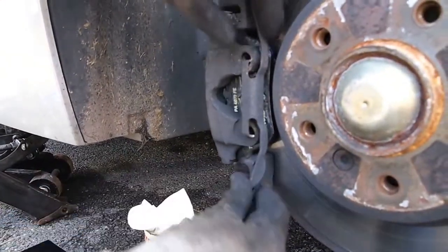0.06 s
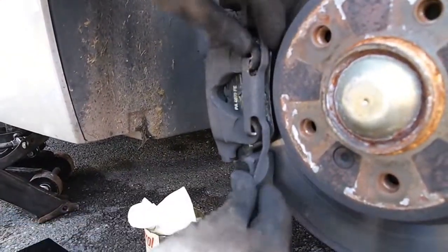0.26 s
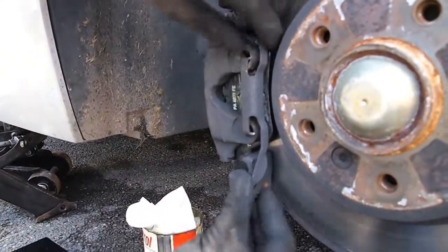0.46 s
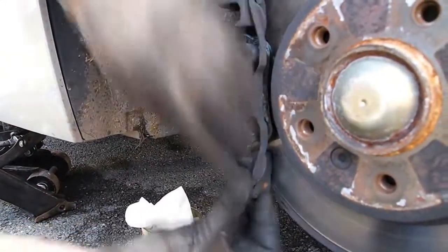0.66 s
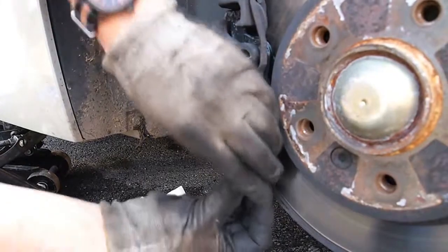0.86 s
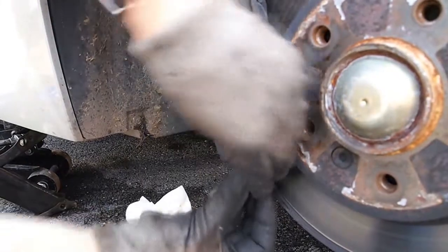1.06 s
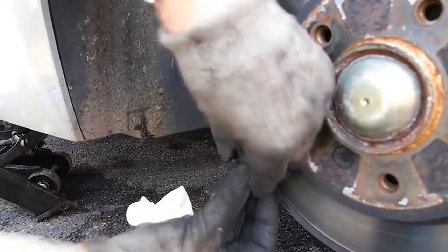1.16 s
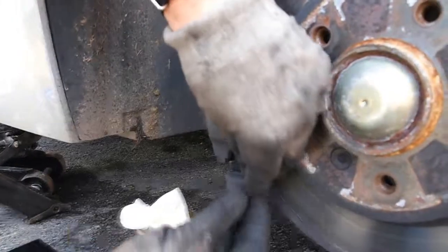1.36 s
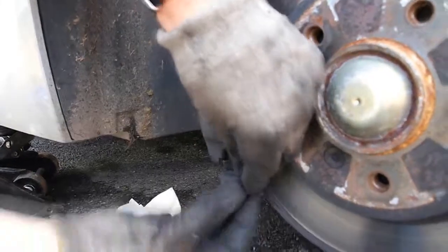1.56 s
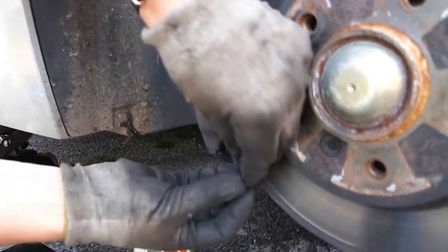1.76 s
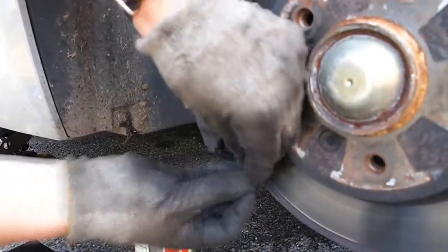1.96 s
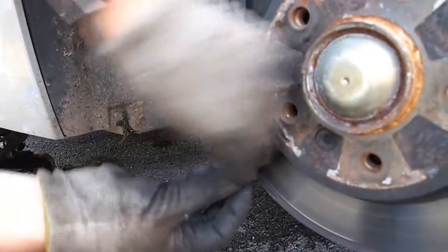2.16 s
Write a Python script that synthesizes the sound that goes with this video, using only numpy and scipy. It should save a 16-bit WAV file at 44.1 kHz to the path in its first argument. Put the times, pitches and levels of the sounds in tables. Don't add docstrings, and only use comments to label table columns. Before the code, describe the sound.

Close-up brake pad clanks outdoors: a bright bouncing snap first, small ticks, a gritty stick-slip slide with a duller knock, then a loud ringing clank as it seats, over quiet wind, distant traffic and hiss.

```python
import sys
import numpy as np
from scipy import signal
from scipy.fft import rfft, irfft
from scipy.io import wavfile
from scipy.ndimage import uniform_filter1d

SR = 44100
rng = np.random.default_rng(int(sys.argv[2]) if len(sys.argv) > 2 else 0)


def voltage_ratio(decibels):
    exponent = np.asarray(decibels, float) / 20
    return 10 ** exponent


def unload_wav(signal):
    wavfile.write(
        sys.argv[1],
        SR,
        np.round(np.clip(np.atleast_2d(signal).T, -1, 1) * 32767).astype(np.int16),
    )


N = 97020


def evened(x):
    return x / np.sqrt(np.mean(x ** 2) + 1e-20)


def read(points, hz):
    f, value = np.transpose(points)
    return np.interp(np.log(hz + 1), np.log(f + 1), value)


def add(mix, s, sound):
    part = mix[round(s * SR):][:len(sound)]
    part += sound[:len(part)]


def band(x, hz, width):
    turn = np.exp(2j * np.pi * hz * np.arange(len(x)) / SR)
    r = np.exp(-np.pi * width / SR)
    smooth = signal.lfilter([(1 - r) ** 2], [1, -2 * r, r * r], x / turn)
    return 2 * (turn * smooth).real


# f/Hz, spectral density level/dB
AIR_SPECTRUM = [(22, -6.5), (50, 2.5), (250, -5.5), (1100, -14.5), (2200, -24.5), (5500, -35), (8500, -33),
                (12500, -31), (15800, -30.5)]


def air():
    level_db, hiss_edge_hz = -40, 15800
    frames, hz = N // 512 + 5, np.fft.rfftfreq(2048, 1 / SR)
    real, imag, patches = rng.standard_normal((frames, 1025, 3)).T
    patches = uniform_filter1d(patches, size=12, axis=0)
    patches = evened(uniform_filter1d(patches, size=6, axis=1))
    drift_db = 0.5 * patches / (1 + (hz[:, None] / 4000) ** 2)
    z = (real + 1j * imag) * voltage_ratio(read(AIR_SPECTRUM, hz)[:, None] + drift_db)
    z = z * (hz < hiss_edge_hz)[:, None]
    noise = signal.istft(z, nperseg=2048, noverlap=1536)[1][:N]
    return voltage_ratio(level_db) * evened(noise)


# t/s, duration/s, level/dB, f/Hz
BUMPS = [
    (0.429, 0.1, -54, 61.6),
    (1.075, 0.047, -53, 45.5),
    (1.42, 0.13, -37, 45.4),
    (1.755, 0.15, -32, 66.5),
]


def bumps():
    wander = 0.179
    out = np.zeros(N)
    for (s, length, db, hz), phase in zip(BUMPS, rng.random(len(BUMPS))):
        t = np.arange(0, length, 1 / SR)
        turns = np.cumsum(hz * (1 + wander * np.cos(3 * np.pi * t / length))) / SR
        swell = np.sin(np.pi * t / length) ** 0.5
        add(out, s, voltage_ratio(db) * swell * np.sin(2 * np.pi * (turns + phase)))
    return out


# t/s, duration/s, level/dB, centre f/Hz
RUBS = [(.25, 0.15, -32, 170), (0.398, 0.14, -40, 193), (0.491, 0.085, -57, 3150), (.56, 0.028, -54, 6000),
        (0.781, 0.042, -48.5, 3530), (0.901, 0.025, -50, 4000), (0.983, 0.048, -55, 2490),
        (1.176, 0.15, -50.5, 2170), (1.328, 0.16, -52.5, 4050), (1.416, 0.085, -43, 3320),
        (1.425, 0.1, -36.5, 400), (1.739, 0.061, -55, 3400), (2.156, 0.083, -51.5, 3370),
        (0.272, 0.15, -42, 640), (0.268, .15, -53, 2200), (.89, 0.067, -42, 258), (1.332, 0.09, -52, 375),
        (1.954, 0.093, -53, 3800)]


def rubs():
    grains_per_s, grain_spread_db, relative_width = 2500, 2.5, 1.03
    out = np.zeros(N)
    for (s, length, db, hz), draw in zip(RUBS, rng.random((len(RUBS), 3, 8000))):
        n = min(round(length * SR), 8000)
        present = draw[0] < grains_per_s / SR
        sign = np.sign(draw[1] - 0.5)
        grains = present * sign * voltage_ratio(-grain_spread_db * np.log(draw[2] + 0.00059))
        rub = evened(band(grains, hz, relative_width * hz))[:n]
        stroke = np.sin(np.pi * np.arange(n) / n) ** 0.63
        add(out, s, voltage_ratio(db) * rub * stroke)
    return out


# t/s, level/dB, f/Hz, bandwidth/Hz, t60/s
TICKS = [(0.437, -42.5, 3220, 4800, 0.051), (0.477, -35.5, 794, 199, 0.025),
         (0.599, -45.5, 3170, 800, 0.044), (0.785, -47, 2050, 1510, 0.07), (0.788, -45, 3880, 4000, 0.036),
         (0.797, -55, 5830, 400, 0.11), (.81, -48, 1660, 150, .15), (.905, -43, 1000, 300, 0.23),
         (0.908, -50, 2260, 200, 0.24), (1.232, -54, 5350, 300, 0.333), (1.342, -42.5, 6270, 5000, 0.042),
         (1.375, -44, 5500, 4060, 0.033), (1.39, -49.5, 3500, 300, 0.095), (1.425, -30, 710, 845, 0.29),
         (1.4253, -25, 1740, 900, 0.21), (1.4497, -29, 6100, 3430, 0.059), (1.467, -28.5, 690, 870, 0.046),
         (1.4709, -39.5, 5100, 6000, 0.2), (1.507, -33, 2000, 2410, 0.1), (1.5062, -39, 6400, 4000, 0.038),
         (1.521, -38, 2310, 3960, 0.026), (1.8014, -30, 2350, 813, 0.037), (2.058, -43, 2380, 250, 0.46),
         (2.1017, -34.5, 2520, 490, 0.035), (2.102, -38, 4520, 1190, 0.05), (2.126, -41, 6780, 2530, 0.025)]


def ticks():
    out, t = np.zeros(N), np.arange(6000) / SR
    for (s, db, hz, width, t60), noise in zip(TICKS, rng.standard_normal((len(TICKS), 6000))):
        click = 5.9 * np.sqrt(SR / width) * (t == 0) / 3
        rattle = evened(band(noise + click, hz, width))
        add(out, s, voltage_ratio(db - 4.5 - 60 * t / t60) * rattle)
    return out


def ring(modes, size=SR):
    twin_ratio, twin_db = 1.011, -11
    t, out = np.arange(size) / SR, 0
    for hz, db, t60 in modes:
        phase = rng.random()
        main = np.sin(2 * np.pi * (hz * t + phase))
        twin = np.sin(2 * np.pi * (hz * twin_ratio * t - phase))
        out = out + voltage_ratio(db - 60 * t / t60) * (main + voltage_ratio(twin_db) * twin)
    return out


# t/s, level/dB
SLIPS = [(1.4274, -21.5), (1.4305, -17), (1.432, -16), (1.438, -21), (1.4428, -26), (1.448, -24),
         (1.4529, -28), (1.455, -30), (1.463, -35), (1.467, -30), (1.474, -32), (1.483, -34.5),
         (1.493, -33), (1.5065, -34), (1.5099, -27), (1.513, -28), (1.5215, -22), (1.527, -31)]
# f/Hz, level/dB, t60/s
SLIP_MODES = [(413, -5.5, 0.024), (800, -4.5, .02), (1114, -2, 0.022), (1714, 1.5, 0.023),
              (2580, -9, 0.017), (3470, -2, 0.013), (6000, -7, 0.0067)]


def slips():
    level_db, scatter = -10, 0.096
    out = np.zeros(N)
    for s, db in SLIPS:
        shift = 1 + scatter * rng.standard_normal(len(SLIP_MODES))
        modes = [(hz * k, d, t60) for (hz, d, t60), k in zip(SLIP_MODES, shift)]
        add(out, s, voltage_ratio(db + level_db) * ring(modes, size=3000))
    return out


# t/s, swell/s, f/Hz, level/dB, t60/s
BENDS = [(.2213, 0.0033, 1040, -11.5, .04), (.2269, .005, 1056, -8, 0.032),
         (.2345, 0.0081, 2332, -8.5, 0.13), (.236, 0.0081, 787, -17, 0.12),
         (1.585, 0.0031, 958, -14, 0.051), (1.5935, 0.0033, 950, -16, 0.016),
         (1.602, 0.0055, 958, -19, 0.084), (1.596, 0.0065, 524, -34, 0.095),
         (1.9407, 0.0079, 786, -12.5, 0.056), (1.939, 0.0054, 1390, -17, 0.043),
         (1.9345, 0.0015, 3250, -15, .03), (1.94, 0.0041, 4400, -14.5, .04),
         (1.4251, 0.00041, 1480, -12, 0.0041), (1.4275, 0.0022, 1900, -26.5, 0.057),
         (1.467, .001, 860, -25.5, .01), (0.7, 0.00044, 2040, -35.5, 0.0065),
         (.233, 0.0014, 1066, -13.5, .02), (1.587, .006, 1040, -24, 0.059), (1.938, 0.012, 548, -16.5, .2),
         (1.94, 0.021, 462, -23, 0.15), (1.936, 0.0062, 400, -21, 0.072)]


def bends():
    out, t = np.zeros(N), np.arange(SR // 2) / SR
    for s, swell, hz, db, t60 in BENDS:
        rise = np.sin(np.pi / 2 * np.minimum(t / swell, 1)) ** 2
        decay = voltage_ratio(db - 60 * np.maximum(t - swell, 0) / t60)
        add(out, s, rise * decay * np.sin(2 * np.pi * hz * t))
    return out


# f/Hz, t60/s
CRACK_T60 = [(120, 0.69), (300, 0.36), (1000, 0.17), (3000, 0.098), (6000, 0.055), (10000, 0.054),
             (16000, 0.038)]


def crack(colour):
    tail_db, tail_stretch = -23, 3.67
    t, edges, out = np.arange(SR) / SR, np.geomspace(80, 18000, 25), 0
    z, hz = rfft(rng.standard_normal((2, SR))), np.fft.rfftfreq(SR, 1 / SR)
    z = z * voltage_ratio(read(colour, hz))
    z = z / np.sqrt(np.sum(abs(z) ** 2)) * SR
    for lo, hi in zip(edges, edges[1:]):
        fall_db = -60 * t / read(CRACK_T60, np.sqrt(lo * hi))
        near, far = irfft(z * ((hz >= lo) & (hz < hi)), SR)
        out = out + near * voltage_ratio(fall_db) + far * voltage_ratio(tail_db + fall_db / tail_stretch)
    return out


# t/s, level/dB, contact time/ms
SNAP = [
    (.2215, -4.5, 0.76),
    (.2245, -14, 0.28),
    (.229, -16, 0.34),
    (.2345, -3.5, 0.078),
    (.2362, -6.5, 0.11),
    (.2389, -8, 0.074),
    (.2435, -7, 0.26),
    (.2505, -11, 0.51),
]
KNOCK = [
    (1.585, -17, 0.18),
    (1.589, -31, 0.51),
    (1.5956, -21, 0.3),
    (1.6029, -24, 0.67),
]
SEAT = [
    (1.9349, -2, 0.12),
    (1.939, -6, 0.28),
    (1.943, -13.5, 0.36),
    (1.951, -7, 1),
    (1.962, -10, 0.54),
]
# f/Hz, level/dB, t60/s
SNAP_MODES = [(170, -10, 0.21), (530, -8, 0.061), (769, -5, 0.079), (1220, -13, 0.12), (1660, -10.5, 0.13),
              (2070, -5, 0.0544), (2185, -5, 0.11), (2344, -11.5, 0.24), (1440, -18, 0.046),
              (2560, -7, 0.084), (2634, -9.5, 0.25), (2720, -5.5, .1), (3030, -18, 0.21), (3610, -7, 0.053),
              (4180, -8, 0.044), (4680, -6.5, 0.1), (5760, 7.5, 0.015), (6460, -9, 0.067)]
KNOCK_MODES = [(246.4, -11.5, 0.144), (523.6, -11.5, 0.16), (783, -19, 0.22), (963, -16, 0.093),
               (2103, -10, .08), (2350, -14.5, .087), (2425, -18.5, 0.24), (3130, -14, 0.095),
               (3192, -21, 0.083), (3532, -8, 0.071), (6000, -10, 0.045)]
SEAT_MODES = [(1096, -11, .15), (1153, -7, 0.13), (1323, -9, 0.12), (1380, -5, 0.072), (1945, -11.5, 0.23),
              (2245, 3.5, 0.078), (2332, 1.5, 0.14), (2597, -3, 0.13), (2745, -13, .1), (2894, -14, 0.15),
              (3125, -5, 0.15), (3590, -5, 0.12), (4310, 3, 0.05), (4580, -8, 0.081), (4860, -17.5, 0.061),
              (6202, 0.5, 0.054)]
# f/Hz, t60/s, then level/dB for snap, knock, seating
DISC = [(471, 0.96, -51, -50, -46), (772, 1.08, -34.5, -56, -33), (1059, 0.68, -26.5, -20, -23.5),
        (1087, 0.533, -32.5, -19, -27.5), (1160, 0.72, -30, -37, -36), (1730, 0.032, -42, -39, -39),
        (1786.5, 0.55, -30, -46, -23), (1949, 0.42, -26, -24.5, -34), (2143, 0.24, -20.5, -34, -28),
        (2700, 0.16, -19, -29, -20.5)]
# f/Hz, spectral density level/dB
SNAP_CRACK = [(100, -20), (200, -6.5), (600, -12), (2000, -6), (3000, 0), (6000, -9.5), (9000, -16),
              (16400, -20)]
KNOCK_CRACK = [(120, -10), (250, -11), (1000, -2.5), (1500, -10.5), (3500, -10), (6000, -14.5),
               (10000, -15), (14000, -50)]
SEAT_CRACK = [(100, -10.5), (250, -13), (700, -5), (2200, -6), (3300, -4.5), (6000, -5.5), (12000, -20),
              (16400, -22)]
# mode level/dB, overtone level/dB, bracket rise time/ms
MODES_DB = (-8, 0, -15)
CRACK_DB = (-9.5, -8.5, -6)
RISE_MS = (0.19, 1.3, 0.95)


def clank(k):
    contact_db, contact_ms, contact_hz = (1.5, -20, -36)[k], 0.98, 7600
    force, t = np.zeros(N), np.arange(SR) / SR
    for s, db, ms in (SNAP, KNOCK, SEAT)[k]:
        u = np.arange(1, 300) / SR / (ms * 0.00076)
        push = u ** 2 * np.exp(-2 * np.pi * u)
        add(force, s, voltage_ratio(db) * push / push.sum())
    bracket = voltage_ratio(MODES_DB[k]) * ring((SNAP_MODES, KNOCK_MODES, SEAT_MODES)[k])
    overtones = voltage_ratio(CRACK_DB[k]) * crack((SNAP_CRACK, KNOCK_CRACK, SEAT_CRACK)[k])
    disc = ring([(row[0], row[2 + k], row[1]) for row in DISC])
    rise = 1 - np.exp(-t * 1e3 / RISE_MS[k])
    contact = evened(band(rng.standard_normal(SR), contact_hz, 0.75 * contact_hz))
    contact = contact * np.exp(-t * 1e3 / contact_ms)
    response = (bracket + overtones + disc) * rise + voltage_ratio(contact_db) * contact
    return signal.fftconvolve(force, response)[:N]


def scene():
    background = air() + bumps()
    handling = rubs() + ticks() + slips() + bends()
    clanks = clank(0) + clank(1) + clank(2)
    return (background + handling + clanks)[None]


def band_limit(x):
    return signal.sosfilt(signal.butter(12, 16700, fs=SR, output="sos"), x)


def record(dry):
    knee_db, squeeze, recover_db_per_s, ceiling = -27, 0.2, 60, 0.9
    notch_hz, notch_width_hz, notch_db, edge_hz = 7890, 90, -11, 16550
    power_db = 10 * np.log10(abs(uniform_filter1d(dry[0] ** 2, size=600)) + 1e-12)
    fall = np.arange(N) * recover_db_per_s / SR
    held_db = np.maximum.accumulate(power_db + fall) - fall
    over_db = np.maximum(held_db - knee_db, 0)
    x = dry * voltage_ratio(-squeeze * uniform_filter1d(over_db, size=300))
    x = x / (1 + (x / ceiling) ** 8) ** (1 / 8)
    hz = np.fft.rfftfreq(N, 1 / SR)
    notch = voltage_ratio(notch_db * np.exp(-((hz - notch_hz) / notch_width_hz) ** 2))
    mix = irfft(rfft(x) * notch / (1 + (hz / edge_hz) ** 200), N)
    return band_limit(mix)


dry = scene()
out = record(dry)
unload_wav(out)
```